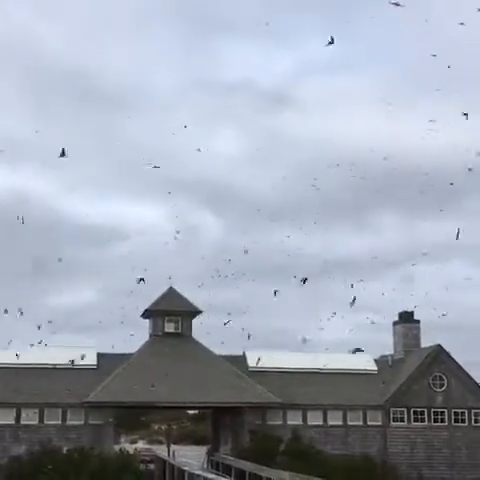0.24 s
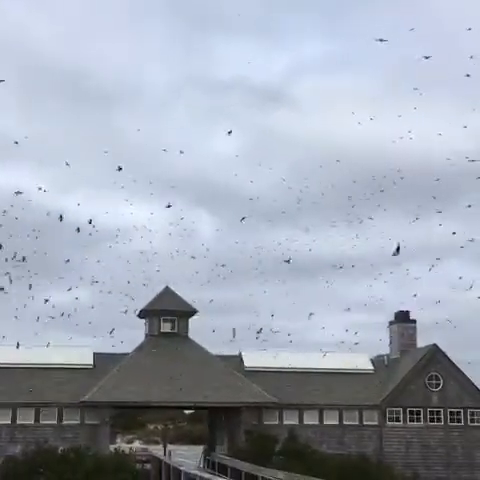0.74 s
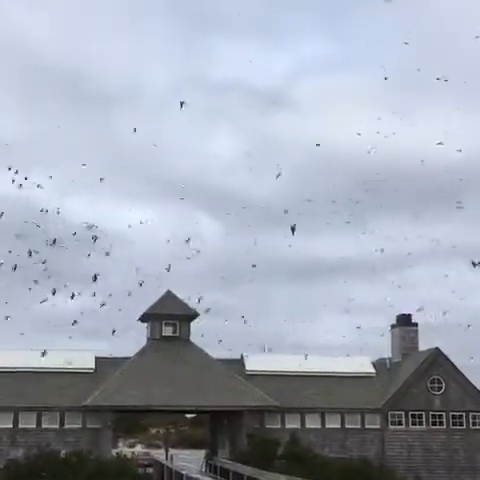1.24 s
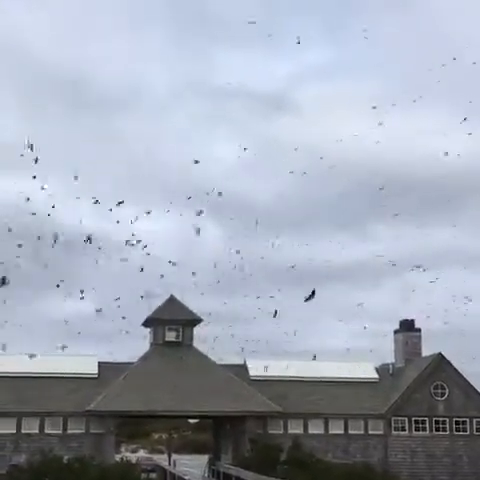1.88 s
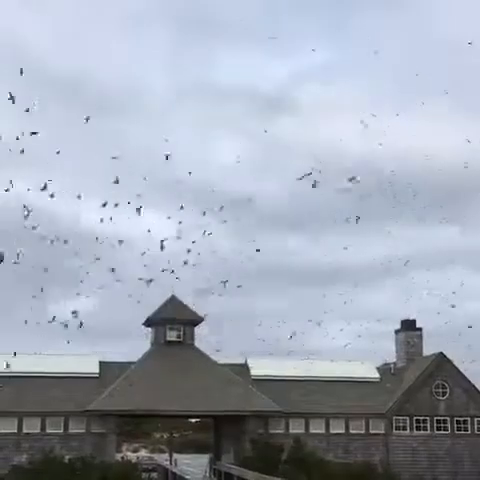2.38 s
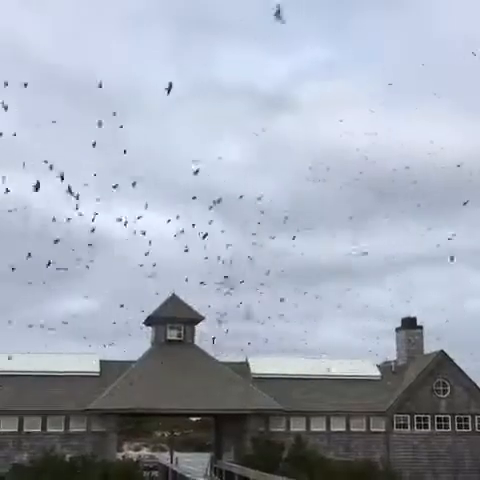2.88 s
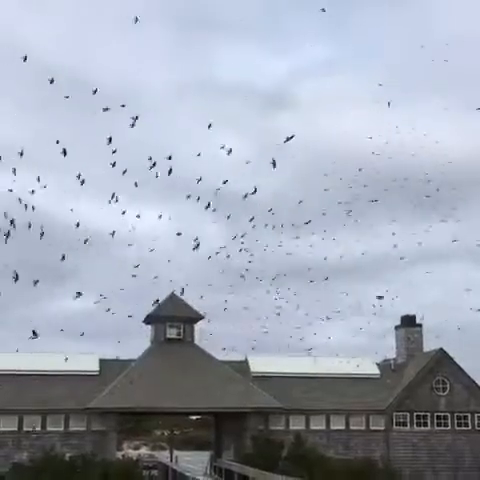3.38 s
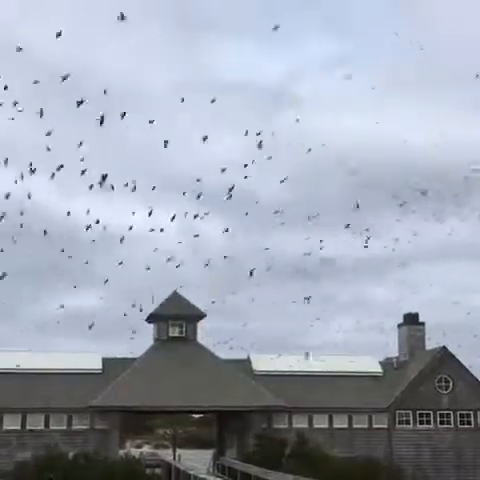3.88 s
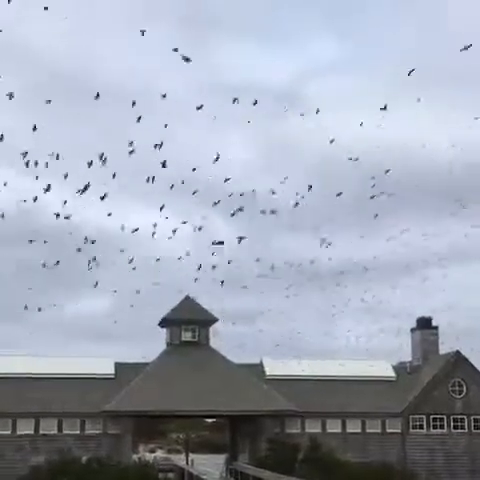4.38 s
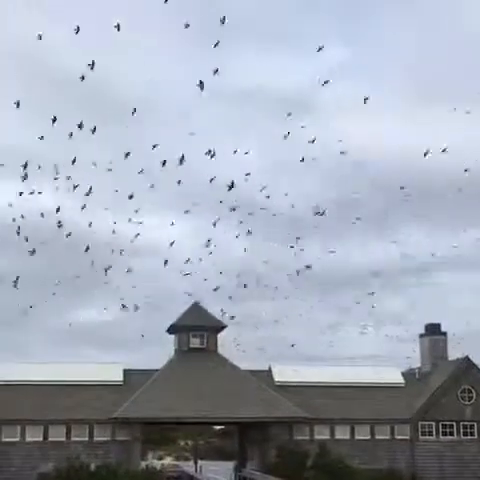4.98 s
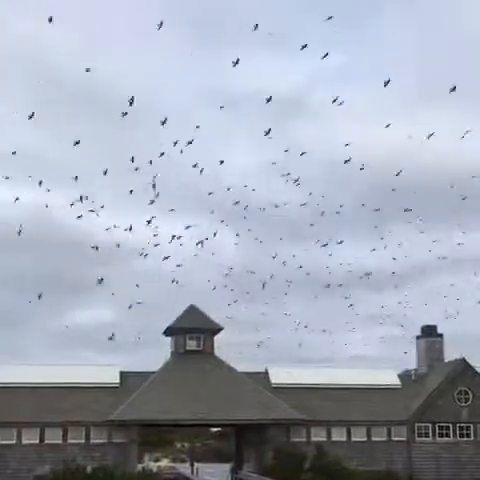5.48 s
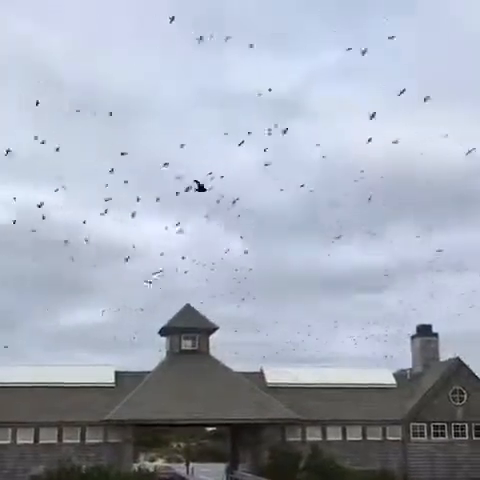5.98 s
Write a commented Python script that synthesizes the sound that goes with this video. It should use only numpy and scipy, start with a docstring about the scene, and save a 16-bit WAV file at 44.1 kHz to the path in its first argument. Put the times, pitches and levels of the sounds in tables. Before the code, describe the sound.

Wind gusts thump and rumble against the microphone, then ease as swallows chirp and buzz overhead, insects trill and a distant engine hums.

```python
"""Gusts with single puffs buffet the microphone at once; later come weaker puffs and a freshening breeze.
Swallows chirp, whistle and buzz near and far: each note is a gliding tone, roughened by fast flutter.
Insects trill in dune grass (tones shaped by wing strokes) and a distant engine hums (a stack of tones).
Wind, the wash of the sea and a faint hiss are shaped noise. For about a second the sound turns hollow:
the treble and the breeze dip and the middle comes forward."""
import sys
import numpy as np
from scipy import signal
from scipy.io import wavfile
from scipy.ndimage import uniform_filter1d

SR = 44100
rng = np.random.default_rng(int(sys.argv[2]) if len(sys.argv) > 2 else 0)


def generate_wav(sig):
    """Save sig (samples, or channels by samples) to the path in sys.argv[1] as 16-bit PCM at SR."""
    pcm = np.round(np.clip(np.atleast_2d(sig).T, -1, 1) * 32767).astype(np.int16)
    wavfile.write(sys.argv[1], SR, pcm)


N = 275184   # length in samples

# low, clear chirps, near and far: pitch rise through the middle, and amount of buzz (0 is a pure tone)
LOW_CHIRP_RISE_HZ, LOW_CHIRP_BUZZ = 300, 0.29


def from_db(db):
    """Turn decibels into a gain."""
    return 10 ** (np.asarray(db) / 20)


def rms_one(x):
    """Scale a sound to unit power."""
    return x / np.sqrt(np.mean(x ** 2) + 1e-20)


def in_time(rows):
    """Draw lines between the rows of a curve and read each column at every sample."""
    s, *columns = np.transpose(rows)
    return [np.interp(np.arange(N) / SR, s, column) for column in columns]


def band(x, low_hz, high_hz, order=2):
    """Keep what lies between two pitches (Butterworth band-pass)."""
    edges_hz = [low_hz, min(high_hz, .45 * SR)]
    return signal.sosfilt(signal.butter(order, edges_hz, "band", fs=SR, output="sos"), x)


def drift(rate, size=N):
    """Wander by chance, with a spread of about 1 and `rate` new random points a second."""
    at = np.arange(size) * rate / SR
    points = rng.standard_normal(int(at[-1]) + 2)
    return np.interp(at, np.arange(len(points)), points)


def turn(hz):
    """Add up a pitch curve into the phase of an oscillator."""
    return 2 * np.pi * np.cumsum(hz) / SR


def add(out, s, sound):
    """Mix a short sound in at time s."""
    i = int(np.clip(s * SR, 0, N - 1))
    out[i:i + len(sound)] += sound[:N - i]


def noise(colour):
    """Build noise of unit power from bands about half an octave wide, each at its level in the colour."""
    hz, db = np.transpose(colour)
    edges = np.geomspace(hz[0], hz[-1], int(2 * np.log2(hz[-1] / hz[0])) + 2)
    white = rng.standard_normal((2, N))   # neighbouring bands take turns between two noises
    out = 0
    for k, (low, high) in enumerate(zip(edges, edges[1:])):
        band_db = np.interp(np.log(low * high) / 2, np.log(hz), db)
        out = out + band(white[k % 2], low, high) * from_db(band_db)
    return rms_one(out)


def after(s, fade_s=0.038):
    """Rise from 0 to 1 around time s."""
    return np.clip((np.arange(N) / SR - s) / fade_s + .5, 0, 1)


def hollow(fade_s=0.16):
    """Rise to 1 while the sound is hollow, and stay at 0 otherwise."""
    from_s, to_s = 1.25, 2.24
    return after(from_s, fade_s) - after(to_s)


def swells(rows, attack_s, release_s, rest_db=-90):
    """Give the level in dB of events that rise up to their time, hold and die away to a resting level."""
    t = np.arange(N) / SR
    gains = []
    for s, hold, db in rows:
        rise = np.minimum(t - s, 0) / attack_s
        fall = np.maximum(t - s - hold, 0) / release_s
        gains.append(from_db(db) * np.exp(rise - fall))
    return 20 * np.log10(np.maximum(np.max(gains, axis=0), from_db(rest_db)))


def chirp(length, hz, fall_hz, buzz, octave_db, sag_hz=0, waver_hz=120, jitter_hz=90, swing_hz=480,
          flutter_hz=520, throb=1.0, edge_s=0.0015, arch=0.47, hook_hz=300):
    """Sing one note: a gliding whistle whose pitch and level flutter fast when the bird buzzes."""
    size = max(int(length * SR), 64)
    u = np.linspace(0, 1, size)   # progress through the note
    # the voice drops into the note and drops again as it ends
    hook = hook_hz * (1 - 2 * u) ** 5
    glide = hz + fall_hz * (.5 - u) + sag_hz * (.7 - np.sin(np.pi * u)) + hook
    # the membranes beat unevenly, which turns the buzz into a rasp
    unevenness = .15 * rng.standard_normal() + .22 * drift(280, size)
    flutter = turn(flutter_hz * np.exp(unevenness))
    waver = waver_hz * drift(130, size) + jitter_hz * (1 + buzz) * drift(1100, size)
    phase = turn(glide + waver + buzz * swing_hz * np.sin(flutter))
    edges = np.clip(np.minimum(u, 1 - u) * length / edge_s, 0, 1)
    swell = edges * (1 - arch + arch * np.sin(np.pi * u)) * from_db(3.3 * drift(132, size))
    voice = np.sin(phase) + from_db(octave_db) * np.sin(2 * phase)
    return rms_one(voice * swell * (1 + throb * buzz * np.cos(flutter)))


def near_swallows(whistle_octave_db=-28, rasp_octave_db=-15, chip_octave_db=-19):
    """Sing the birds heard one by one; a forced, buzzing voice carries more of its octave."""
    # Two-voiced whistles, one pitch for each side of the syrinx (the bird's voice organ).
    # Each row: start in seconds, length in seconds, lower pitch in Hz, upper pitch in Hz, level in dB,
    # upper voice relative to the lower in dB.
    whistle_rows = [(0.367, 0.058, 5660, 6350, -59, 1), (0.423, 0.052, 5800, 6390, -58, 1),
                    (0.568, 0.055, 5600, 6600, -59.5, -10), (0.696, 0.089, 5540, 6500, -54, -9),
                    (0.784, 0.08, 5610, 6530, -56.5, -8.5), (.988, 0.12, 5100, 6600, -55, -10)]
    # Rasps, buzzing around one pitch.
    # Each row: start in seconds, length in seconds, pitch in Hz, level in dB.
    rasp_rows = [(1.68, 0.071, 5760, -74), (2.031, 0.085, 6280, -72.5), (2.241, 0.044, 6020, -54),
                 (2.243, 0.052, 7330, -62), (2.367, 0.04, 5970, -54), (2.425, 0.039, 5150, -61),
                 (2.507, 0.053, 6260, -55.5), (2.56, .05, 5300, -61.5), (3.191, 0.05, 6480, -60),
                 (3.463, .075, 6020, -57), (3.488, 0.037, 5360, -53), (3.615, 0.075, 5290, -55.5),
                 (3.84, 0.028, 6300, -61), (3.961, 0.081, 6100, -59.5), (4.134, 0.12, 5990, -55),
                 (4.188, 0.087, 6260, -50.5), (4.406, .072, 5650, -53), (4.799, 0.031, 5760, -55.5),
                 (4.915, 0.034, 5870, -62.5), (5.354, 0.05, 5900, -65), (5.483, 0.023, 6040, -49.5),
                 (5.507, 0.047, 6430, -55), (5.945, 0.091, 5900, -60)]
    # Chips, swept downward.
    # Each row: start in seconds, length in seconds, middle pitch in Hz, steady part of the fall in Hz,
    # level in dB.
    chip_rows = [(1.163, .028, 7130, 180, -70), (2.28, 0.025, 5520, 200, -53.5),
                 (2.966, 0.029, 5340, 600, -58.5), (3.135, 0.055, 5260, 450, -63),
                 (3.244, 0.041, 5810, 800, -54.5), (3.5, 0.1, 6560, 550, -55),
                 (3.728, 0.05, 5540, 522, -51.5), (3.923, .028, 5880, 650, -63),
                 (4.549, 0.048, 5880, 816, -55), (4.743, 0.061, 5720, 795, -50.5),
                 (5.113, .025, 3490, 1440, -64), (5.113, .031, 6570, 850, -56.5),
                 (5.16, 0.029, 3460, 430, -66), (5.213, 0.034, 6540, 1690, -57)]
    # Low, clear chirps. Each row: start in seconds, length in seconds, middle pitch in Hz, level in dB.
    low_rows = [(0.803, .03, 3550, -64.5), (2.945, 0.018, 3300, -66), (3.61, 0.036, 3250, -69),
                (5.935, 0.038, 3400, -72)]
    out = np.zeros(N)
    for s, length, lower_hz, upper_hz, db, upper_db in whistle_rows:
        for hz, level in ((lower_hz, db), (upper_hz, db + upper_db)):
            # a whistle sags in the middle
            note = chirp(length, hz, fall_hz=40.3, buzz=0.15, octave_db=whistle_octave_db,
                         sag_hz=130, waver_hz=70.6, jitter_hz=80.5, edge_s=0.0056)
            add(out, s, from_db(level) * note)
    for s, length, hz, db in rasp_rows:
        note = chirp(length, hz, fall_hz=60, buzz=0.53, octave_db=rasp_octave_db)
        add(out, s, from_db(db) * note)
    for s, length, hz, fall_hz, db in chip_rows:
        note = chirp(length, hz, fall_hz, buzz=0.47, octave_db=chip_octave_db)
        add(out, s, from_db(db) * note)
    for s, length, hz, db in low_rows:
        note = chirp(length, hz, -LOW_CHIRP_RISE_HZ, LOW_CHIRP_BUZZ, chip_octave_db)
        add(out, s, from_db(db) * note)
    return out


def far_swallows(count=150, centre_hz=5750, fall_hz=450, octave_db=-20, low_share=0.19, low_hz=3250,
                 low_db=-13):
    """Merge many faint falling notes into a twitter, with a lower, clearer chirp now and then."""
    # The level of the far flock, very faint at first, then swelling and fading.
    # Each row: time in seconds, level in dB.
    flock_level = [(0, -89), (2.1, -77.5), (2.4, -65), (2.8, -72), (3.7, -63), (4.9, -73.5), (6.24, -65)]
    out = np.zeros(N)
    for k, (when, long, high, buzz, loud, kind) in enumerate(rng.random((count, 6))):
        pitch = 1 + 0.27 * (high - .5)
        if kind < low_share:
            note = chirp(0.019 + 0.027 * long, low_hz * pitch, -LOW_CHIRP_RISE_HZ, LOW_CHIRP_BUZZ, octave_db)
            note = from_db(low_db) * note
        else:
            note = chirp(0.0216 + 0.049 * long, centre_hz * pitch, fall_hz, .7 * buzz, octave_db)
        start_s = (k + 2 * when) / count * N / SR
        add(out, start_s, from_db(12.7 * loud) * note)
    return rms_one(out) * from_db(in_time(flock_level)[0])


def insects(duty=.72, second_db=-22, third_db=-22):
    """Draw a file over a scraper with each wing stroke; the tone sinks as the wing slows."""
    # Trilling insects. Each row: average wing strokes per second, pitch in Hz at the start of a stroke,
    # pitch in Hz at its end, level in dB relative to the others.
    insect_rows = [(17.4, 4550, 4030, 1), (16.05, 4200, 3650, -1), (19.15, 4360, 4000, -2),
                   (21.2, 5060, 4000, -11)]
    out = 0
    for k, (rate, top_hz, end_hz, db) in enumerate(insect_rows):
        strokes = np.cumsum(rate * (1 + .12 * drift(12))) / SR + rng.random()
        u = np.minimum(strokes % 1 / duty, 1)   # progress through a stroke, then a rest
        sinking_hz = top_hz + (end_hz - top_hz) * u ** 2
        phase = turn(sinking_hz + 45 * drift(25) + 65 * drift(600))
        overtones = from_db(second_db) * np.sin(2 * phase) + from_db(third_db) * np.sin(3 * phase)
        # the nearest one is the brightest; swaying grass lets its overtones come and go
        brightness = 1.7 if k == 0 else .3
        tone = np.sin(phase) + overtones * brightness * from_db(5.0 * drift(8))
        stroke = np.abs(np.sin(np.pi * u ** 0.69))
        out = out + tone * stroke * from_db(db + 3.23 * drift(14) + 3.4 * drift(250))
    # the trill is softer at first and while the sound is hollow
    level_db = -61.5 - 4.5 * (1 - after(0.37)) - 4.5 * hollow()
    return rms_one(out) * from_db(level_db)


def wind(lump_db=3.5, climb=0.85, upper_db=-57, steepness=1.44, buffet_s=0.0048):
    """Tumble eddies over the microphone port: a lumpy rumble that reaches higher the harder it blows."""
    # Gusts. Each row: time of full strength in seconds, hold in seconds, level in dB.
    gust_rows = [(0, 0.16, -30.5), (.18, 0.342, -27.5), (.61, 0.047, -32), (.8, 0.218, -35),
                 (1.19, .04, -39.5)]
    # Sharp buffets within the gusts. Each row: time in seconds, level in dB.
    buffet_rows = [(0.025, -26), (0.06, -28.5), (0.105, -27), (0.129, -27.5), (0.197, -29), (.224, -30),
                   (0.437, -40), (0.637, -42), (0.968, -33)]
    # Times when the breeze freshens.
    # Each row: time of full strength in seconds, hold in seconds, level in dB.
    freshening_rows = [(2.3, 0.061, -48), (2.74, 0.22, -49), (5.3, 0.1, -44.5), (5.97, 0.044, -45.5)]
    # Noise colours of gust and breeze. Each row: frequency in Hz, relative level in dB per Hz.
    gust_colour = [(25, -19), (45, 3.5), (95, 1), (180, 3), (240, -6), (310, -21.5), (420, -28.5)]
    breeze_colour = [(20, -21), (40, -1), (65, 0.5), (100, -9), (160, -9.5), (300, -33.5)]
    attack_s = 0.071   # a gust builds slowly and drops quickly
    gust_db = swells(gust_rows, attack_s, release_s=0.019)
    wake_db = -16 + swells(gust_rows, attack_s, release_s=0.2)   # weaker turbulence trails each gust
    db = np.maximum(gust_db, wake_db)
    strength = db + 31.5   # dB above a moderate gust
    rumble = band(noise(gust_colour), 34, 480, order=4)
    deep = band(rumble, 20, 117) * from_db(-climb * strength)
    higher = band(rumble, 123, 530) * from_db(climb * strength)
    rumble = deep - higher
    # even out the loudness, then give it the level of the gusts
    rumble = rumble / np.sqrt(uniform_filter1d(rumble ** 2, size=SR // 30) + 1e-9)
    rumble = rumble * from_db(db + lump_db * drift(44.75))
    # hard wind and sharp buffets add a rough flapping above the rumble
    t = np.arange(N) / SR
    force = from_db(upper_db + steepness * strength)
    for s, level in buffet_rows:
        force = force + from_db(level) * np.exp(-((t - s) / buffet_s) ** 2 / 2)
    flap_colour = [(200, 14.0), (350, 3.0), (550, -2.5), (720, -31.5), (950, -21), (1300, -48)]
    flapping = band(noise(flap_colour), 146, 840, order=3)
    flapping = flapping / np.sqrt(uniform_filter1d(flapping ** 2, SR // 100) + 1e-9)
    # light air between the gusts
    breeze_db = swells(freshening_rows, attack_s=0.14, release_s=0.26, rest_db=-52.5) - 5 * hollow()
    breeze = noise(breeze_colour) * from_db(breeze_db + 2.5 * drift(14))
    return rumble + flapping * force + breeze


def puffs(cycles=0.44):
    """Push and pull the membrane once or twice with a single eddy."""
    # Single puffs of wind. Each row: time in seconds, strength in dB, pitch in Hz.
    puff_rows = [(.085, -19, 98), (0.642, -15.5, 92), (0.905, -18.5, 73), (0.969, -22.5, 88),
                 (1.004, -25, 114), (1.097, -29.5, 60.4), (1.187, -25, 64), (1.225, -26.5, 70.6),
                 (1.525, -31, 68.4), (2.004, -32.5, 66), (3.245, -33, 62), (5.025, -31, 84),
                 (5.149, -30.5, 61), (5.349, -31.5, 72.4)]
    out = np.zeros(N)
    for s, db, hz in puff_rows:
        u = (np.arange(N) / SR - s) * hz   # cycles from the middle of the puff
        near = np.abs(u) < 4
        bump = np.exp(-(u[near] / cycles) ** 2 / 2)
        out[near] -= from_db(db) * bump * np.sin(2 * np.pi * u[near])
    return out


def engine(waver_db=1.0, upper_waver_db=1.8):
    """Hum a far exhaust note that sinks slowly; moving air makes each order (multiple) waver."""
    # Orders of the engine. Each row: multiple of the firing rate, level in dB added to the curves below.
    order_rows = [(1, -4.5), (2, 2), (3, -14), (4, -15.5), (5, -24), (6, -31.5), (7, -29.5), (8, -27.5)]
    # Level curve of the second order. Each row: time in seconds, level in dB.
    second_level = [(1.3, -57), (1.49, -53), (1.9, -56.5), (3.87, -46.5), (5.29, -52.5), (5.77, -46.5),
                    (6.24, -49)]
    # Level curve of all other orders. Each row: time in seconds, level in dB.
    other_level = [(1.3, -50.5), (2.1, -50.5), (2.4, -54.5), (3.3, -50.5), (3.9, -49.5), (4.7, -55.5),
                   (6.24, -53)]
    hz = 83.76 - .53 * np.arange(N) / SR   # firing rate, sinking in Hz per second
    second_db, = in_time(second_level)
    others_db, = in_time(other_level)
    phase = turn(hz * (1 + 0.00343 * drift(9)))
    out = 0
    for k, (_, order_db) in enumerate(order_rows, 1):
        if k == 2:
            level = second_db + waver_db * drift(8)
        else:
            level = others_db + upper_waver_db * drift(8)
        out = out + from_db(level + order_db) * np.sin(k * phase + 2 * np.pi * rng.random())
    return np.sqrt(2) * out


def sea_wash():
    """Wash steadily as shaped noise with waves that rise above it; the middle swells in the hollow part."""
    # Waves. Each row: time of full height in seconds, hold in seconds, level in dB.
    wave_rows = [(4.2, 0.15, -59.5), (5.1, 0.15, -62)]
    # Noise colours of the sea and of the hollow part.
    # Each row: frequency in Hz, relative level in dB per Hz.
    sea_colour = [(100, 14), (220, 13.5), (380, 3.5), (520, -6), (700, 11.5), (850, -1), (1080, -0.5),
                  (1400, -4), (2500, -12.5), (5000, -36)]
    hollow_colour = [(250, 5), (350, 8.5), (500, -3), (700, 0), (870, 1.5), (1060, 0.5), (1400, -8.5),
                     (2500, -21)]
    sea_db = swells(wave_rows, attack_s=0.53, release_s=1, rest_db=-65)
    sea = noise(sea_colour) * from_db(sea_db)
    return sea + noise(hollow_colour) * from_db(-65) * hollow(fade_s=0.47)


def high_hiss():
    """Hiss faintly as high noise, a little stronger at first and weaker in the hollow part."""
    # Noise colour of the hiss. Each row: frequency in Hz, relative level in dB per Hz.
    hiss_colour = [(1000, -7.5), (2500, 5), (3500, 3.5), (6000, 3.5), (8000, -2), (10500, 2.5), (13000, 1),
                   (15500, -2)]
    level_db = -71 + 4 * (1 - after(0.27)) - 4 * hollow()
    return noise(hiss_colour) * from_db(level_db)


def outdoors(x, echo_db=-17, tail_db=-17, tail_t60=0.38):
    """Return a few echoes from ground and walls; roofs and bushes scatter a short tail."""
    t = np.arange(SR // 2) / SR
    response = rng.standard_normal(len(t)) * from_db(-60 * t / tail_t60)
    response *= from_db(tail_db) / np.linalg.norm(response)
    echo_s = rng.uniform(.003, .07, 3)
    response[(echo_s * SR).astype(int)] += from_db(echo_db)
    return x + signal.fftconvolve(x, response)[:N]


def scene():
    """Mix birds and insects in the open air over wind, engine, sea and hiss."""
    overhead = outdoors(near_swallows(), echo_db=-22, tail_db=-16.5, tail_t60=.4)
    around = outdoors(insects() + far_swallows(), echo_db=-14, tail_db=-12, tail_t60=.35)
    background = engine() + sea_wash() + high_hiss()
    return (overhead + around + wind() + puffs() + background)[None]


def record(dry, low_cut_hz=28, cutoff_hz=15350):
    """Shed the deepest bass, as the microphone does, and cut the top steeply."""
    thinned = signal.sosfilt(signal.butter(3, low_cut_hz, "high", fs=SR, output="sos"), dry)
    return signal.sosfilt(signal.ellip(12, .1, 80, cutoff_hz, fs=SR, output="sos"), thinned)


dry = scene()
out = record(dry)
generate_wav(out)
```